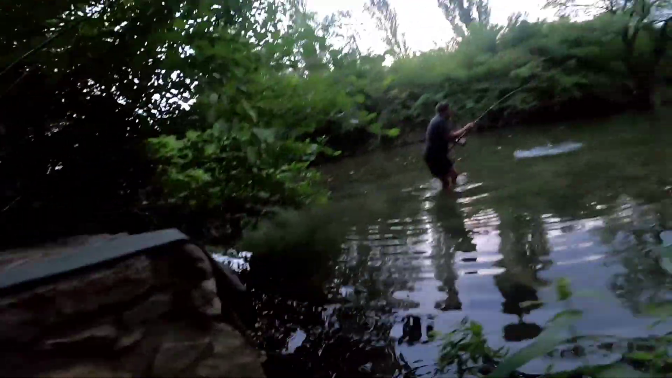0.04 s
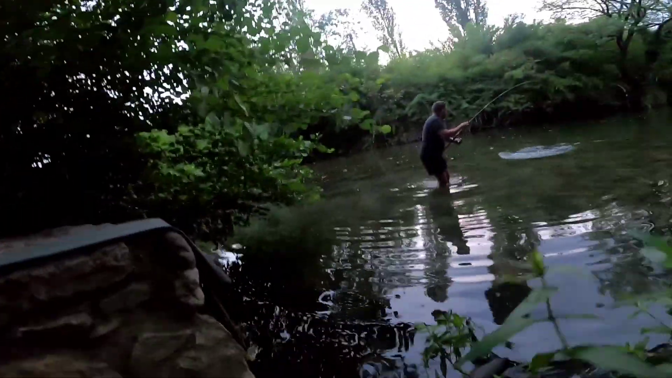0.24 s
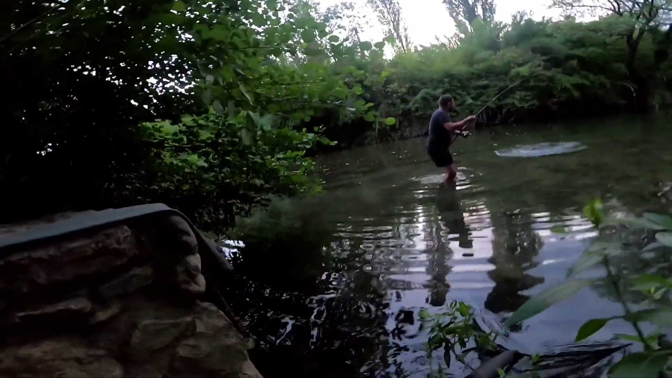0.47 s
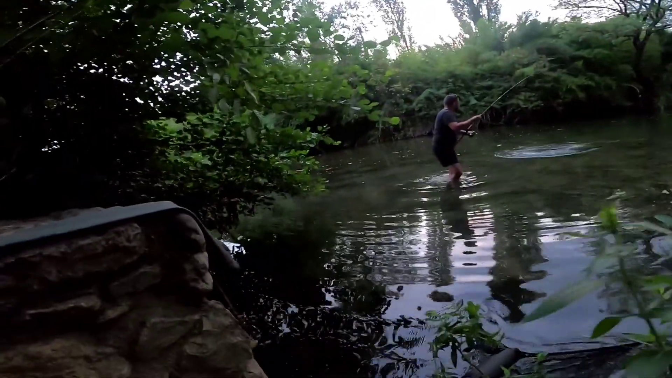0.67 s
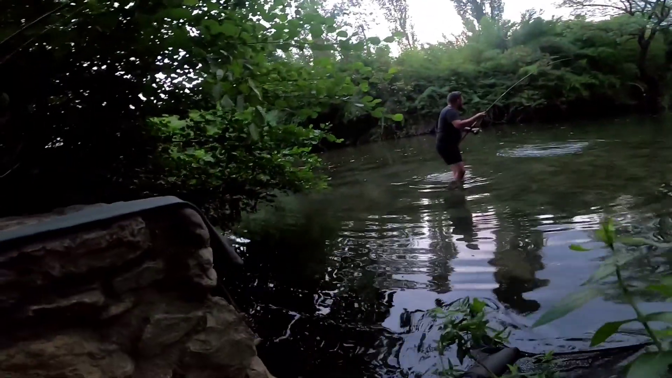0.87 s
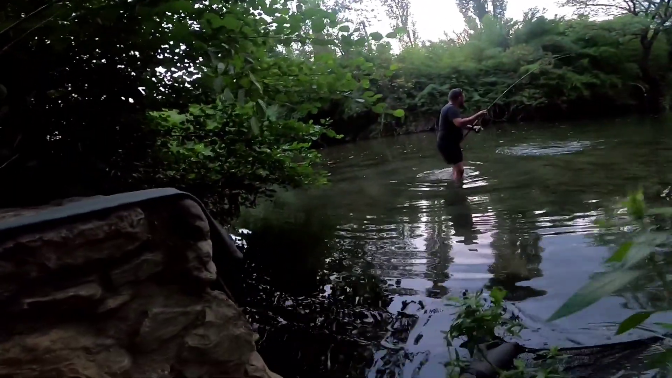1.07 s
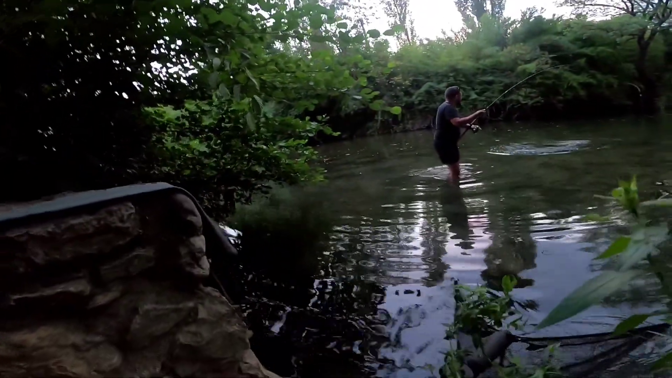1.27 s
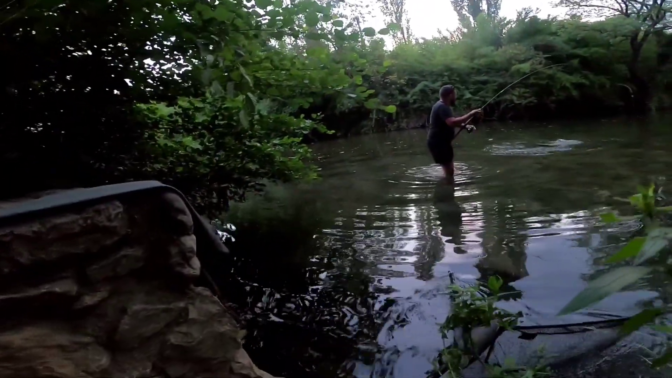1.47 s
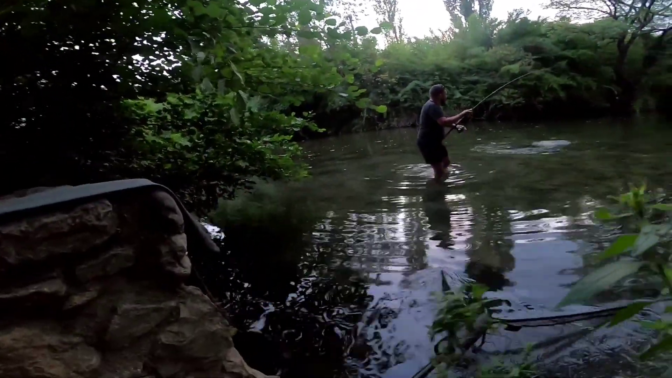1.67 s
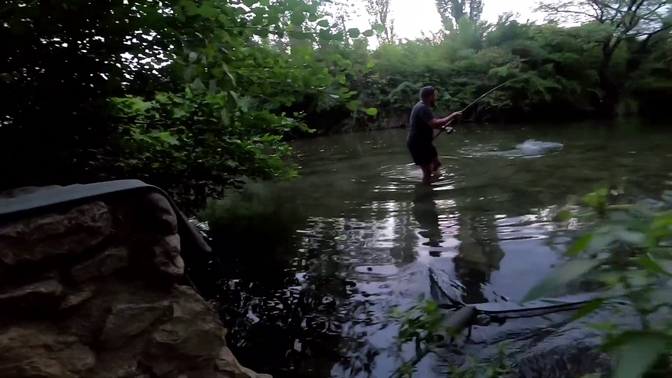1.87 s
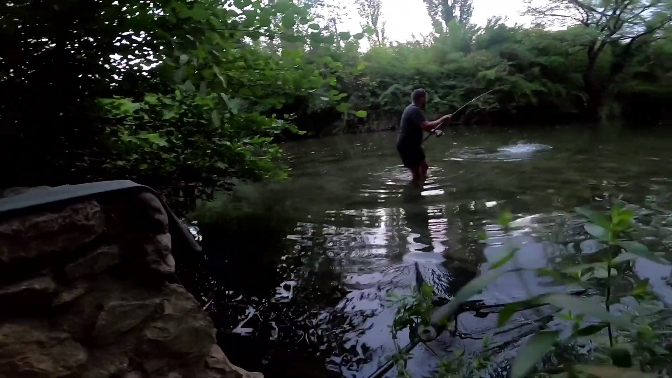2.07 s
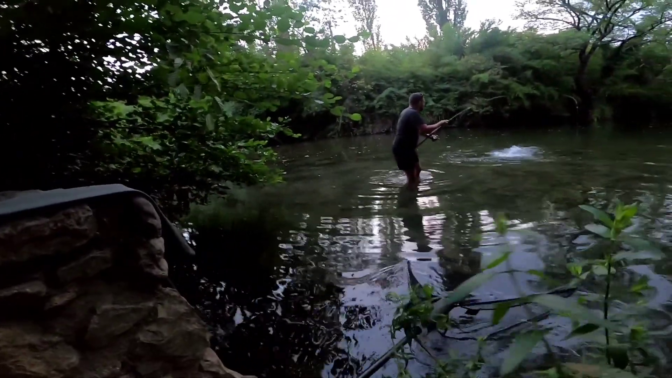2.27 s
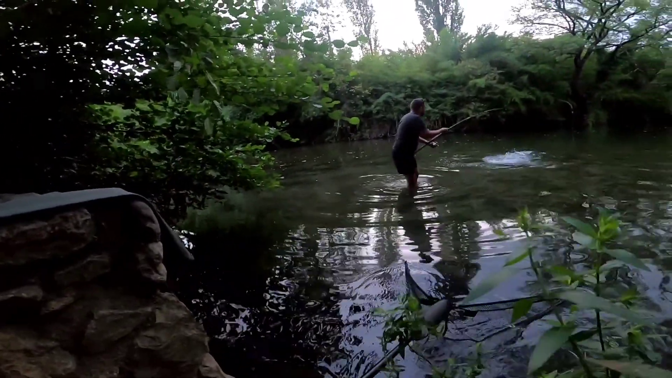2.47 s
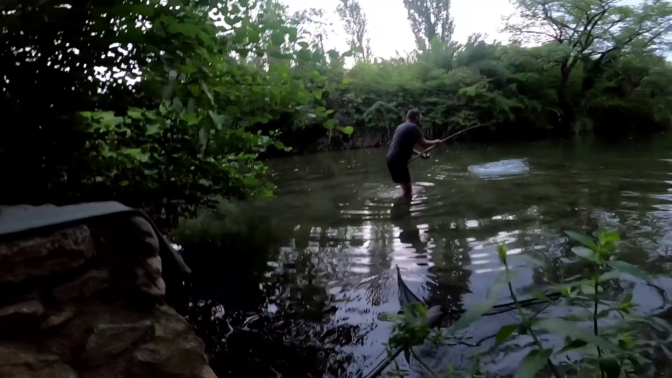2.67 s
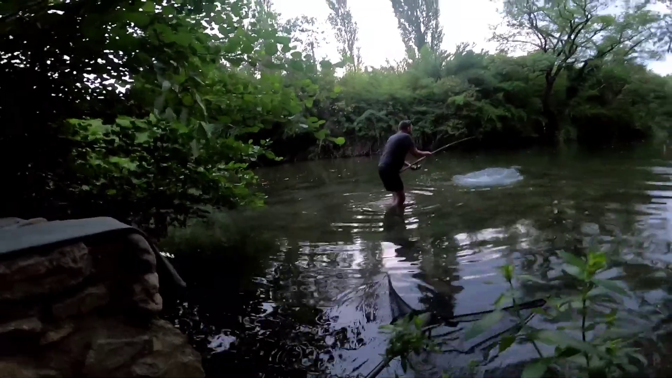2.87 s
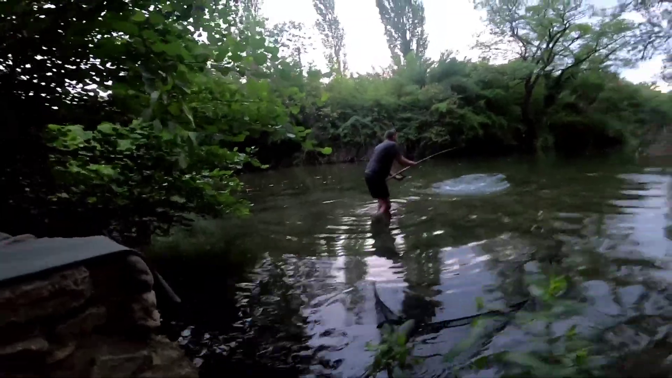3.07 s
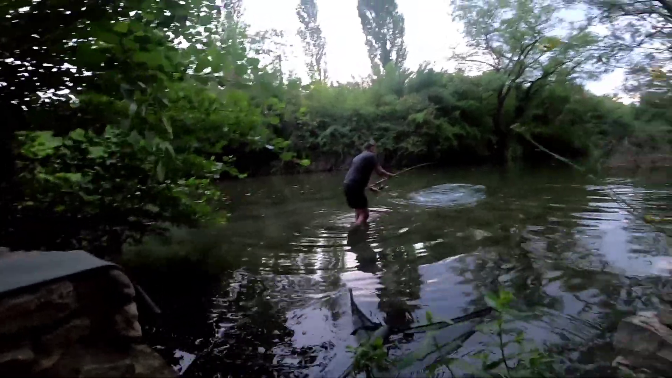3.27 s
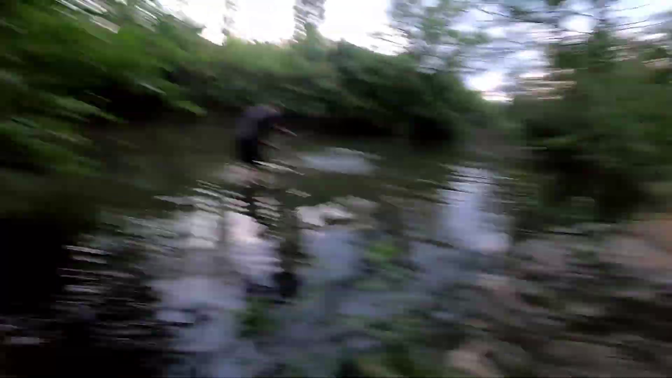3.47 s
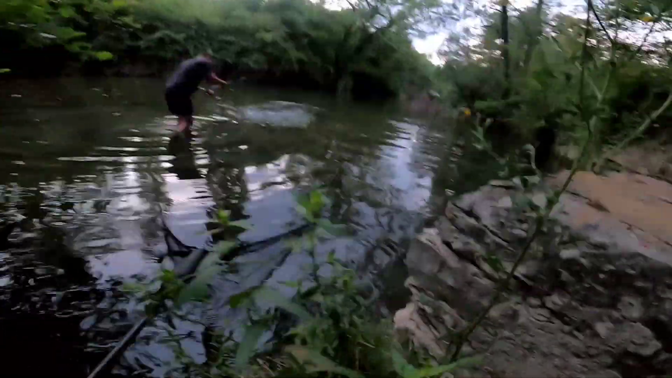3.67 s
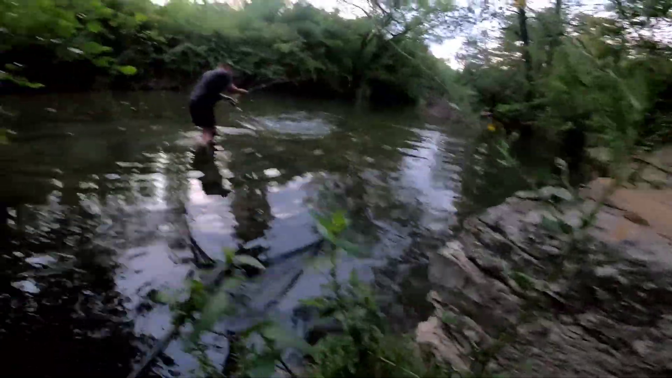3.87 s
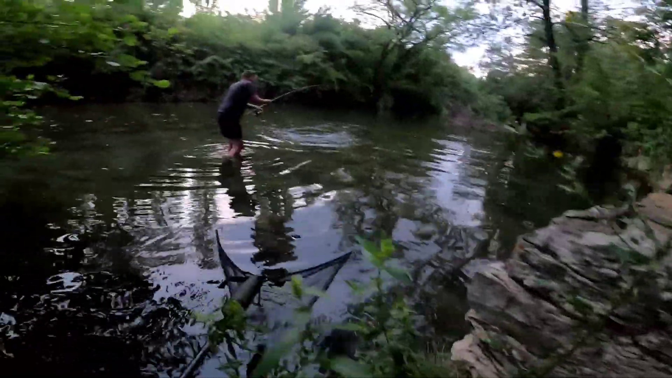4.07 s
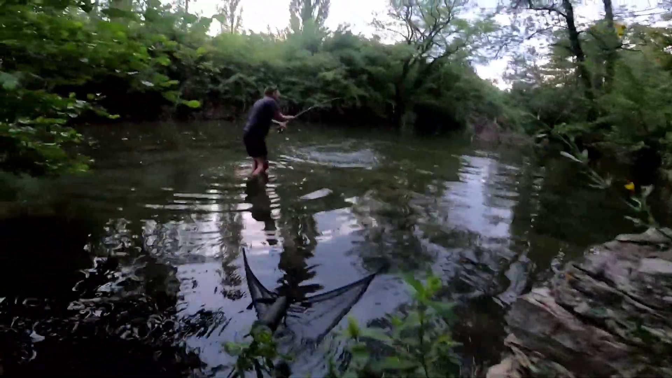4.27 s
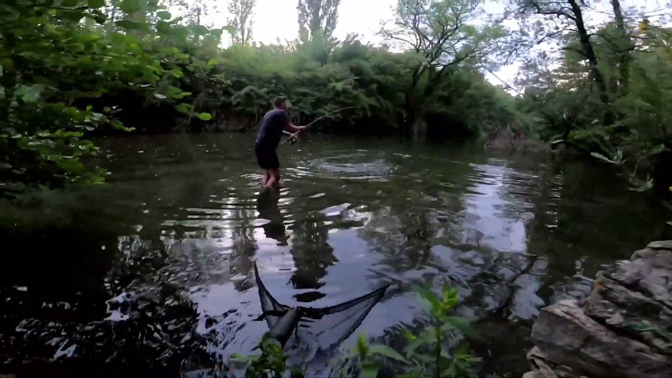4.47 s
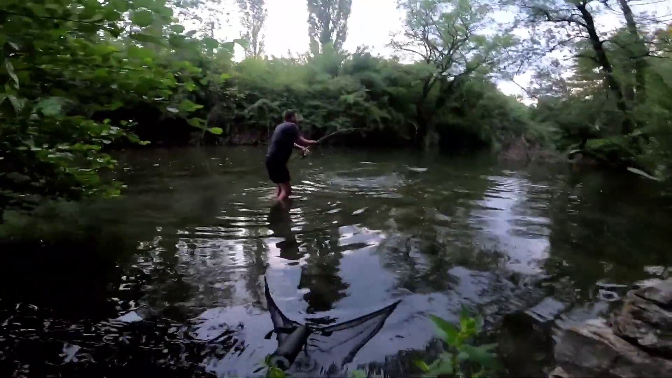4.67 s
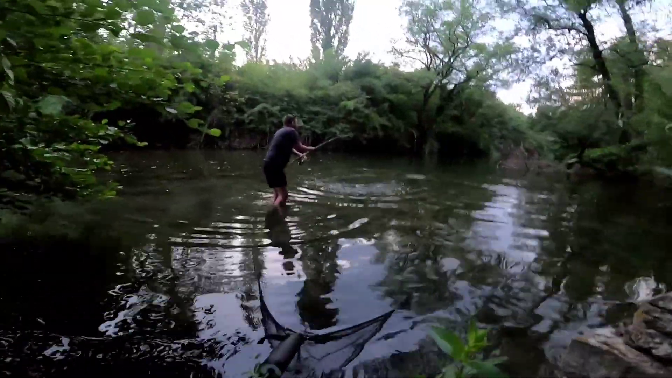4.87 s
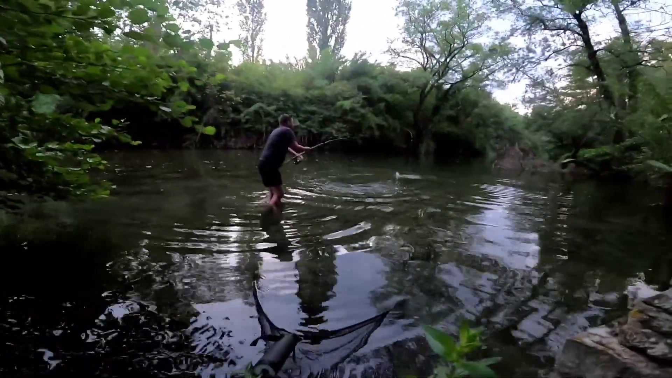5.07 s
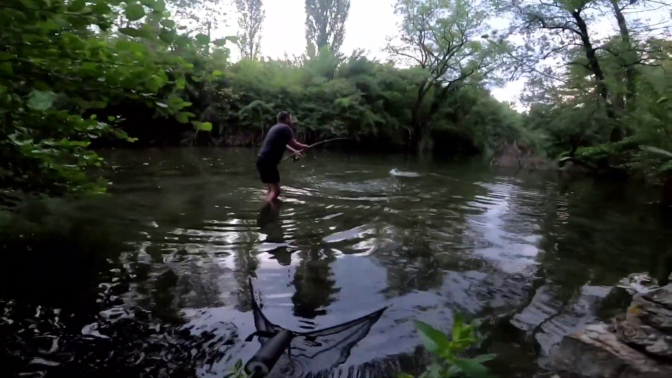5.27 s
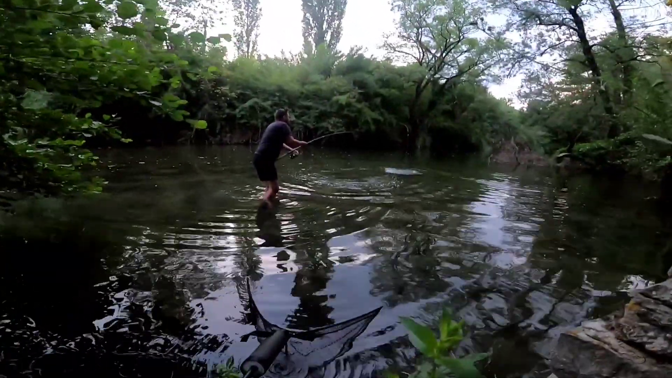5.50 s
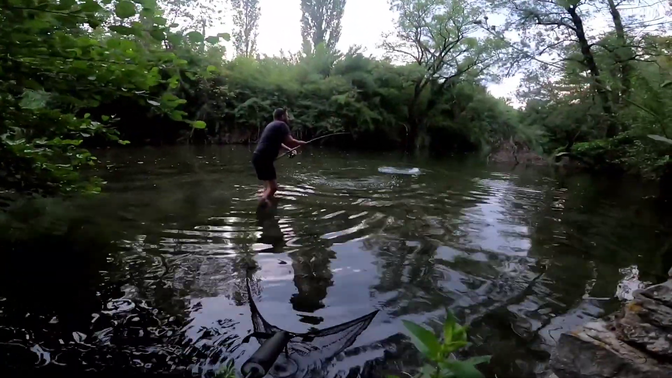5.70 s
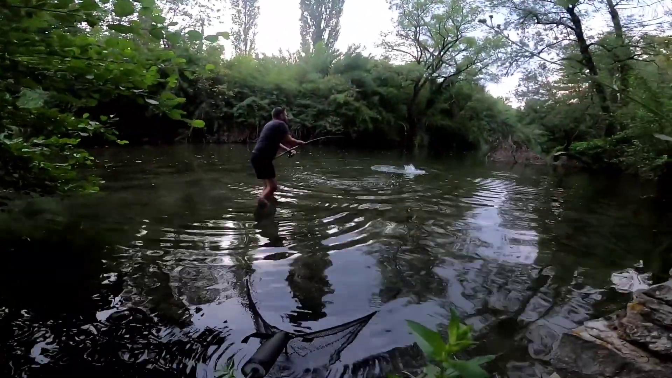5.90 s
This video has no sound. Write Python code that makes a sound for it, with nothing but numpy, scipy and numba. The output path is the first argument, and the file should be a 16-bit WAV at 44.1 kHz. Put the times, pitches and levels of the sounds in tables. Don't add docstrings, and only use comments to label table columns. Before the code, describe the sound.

Outdoors by a tree-lined river, a cicada chirps rapidly over a far insect chorus. Wading legs make small plinks and drips, wind thumps the microphone, then a fish thrashes hard around two seconds with fizzing, gulping splashes. The cicada turns to a continuous drone while drops fall back, then a second splash burst comes with quick reel ticks and renewed chirps.

```python
import sys
import numpy as np
from scipy import signal
from scipy.io import wavfile
from scipy.ndimage import uniform_filter1d
from numba import njit

SR = 44100
rng = np.random.default_rng(int(sys.argv[2]) if len(sys.argv) > 2 else 0)


def voltage_ratio(decibels):
    exponent = np.asarray(decibels, float) / 20
    return 10 ** exponent


def put_to_file(sound):
    columns = np.atleast_2d(sound).T
    safe = np.clip(columns, -1, 1)
    whole_steps = np.round(safe * 32767)
    wavfile.write(sys.argv[1], SR, whole_steps.astype(np.int16))


N = 261954
T = np.arange(N) / SR


def level(x, db):
    return x * voltage_ratio(db) / np.sqrt(np.mean(x ** 2))


def band(x, lo_hz, hi_hz, order=2):
    return signal.sosfilt(signal.butter(order, [lo_hz, hi_hz], "band", fs=SR, output="sos"), x)


def walk(rate):
    hold = int(SR / rate)
    steps = np.repeat(rng.standard_normal(N // hold + 1), hold)
    return 1.64 * uniform_filter1d(uniform_filter1d(steps, hold), hold)[:N]


def even(x, span_s):
    span = int(span_s * SR)
    power = np.mean(np.atleast_2d(x) ** 2, axis=0)
    power = uniform_filter1d(uniform_filter1d(power, span), span)
    return x / np.sqrt(power + 0.077 * np.mean(power))


def swells(s, db, rise_s, fall_s):
    t = T[::64, None]
    rising = (s - t) / np.maximum(rise_s, .005)
    falling = (t - s) / np.maximum(fall_s, .005)
    away = np.maximum(rising, falling)
    return np.interp(T, t[:, 0], np.sqrt(np.sum(voltage_ratio(2 * (db - 20 * away)), axis=1)))


@njit
def ring(s, hz, t60, climb, onset, left, right):
    out = np.zeros((2, N))
    for k in range(len(s)):
        start, n, phase = int(s[k] * SR), int(t60[k] * SR) + 1, 0.
        fade, size = np.exp(-np.log(1000.) / n), 1.
        for i in range(max(-start, 0), min(n, N - start)):
            phase += 2 * np.pi * hz[k] * (1 + climb[k] * min(3 * i / n, 1.25) ** 1.6) / SR
            size *= fade
            v = size * np.sin(phase) * np.sin(min(phase / onset, np.pi / 2)) ** 2
            out[0, start + i] += left[k] * v
            out[1, start + i] += right[k] * v
    return out


def grains(s, db, hz, t60, climb, pan_db, onset=1.6):
    s, db, hz, t60, climb, pan_db = (np.zeros(len(s)) + c for c in (s, db, hz, t60, climb, pan_db))
    left, right = voltage_ratio(db + pan_db / 2), voltage_ratio(db - pan_db / 2)
    return ring(s, hz, np.clip(t60, 1e-3, 1), np.clip(climb, -.2, 1.5), onset, left, right)


def foam(lo_hz, hi_hz, cycles, climb, scatter_db, count):
    when, size, tune, place = rng.random((count, 4)).T
    hz = lo_hz * (hi_hz / lo_hz) ** tune
    db = -scatter_db * np.log(size + 0.01)
    pan_db = 3 * (place - .5) - 1.8
    return even(grains(when * N / SR, db, hz, cycles / hz, climb, pan_db, onset=5.3), 0.032)


def splash():
    # t/s, strength/dB, depth [0-1], rise/s, fall/s (each over 20 dB)
    slaps = [(0.01, -49, 0.3, 0.12, 0.21), (0.42, -54, .0, 0.86, 0.23), (1.5, -60.5, 0.27, 0.25, 0.55),
             (1.7, -66, 0.99, 0.089, 0.08), (1.8, -54.5, 0.4, 0.24, 0.062), (2.026, -37.5, 0.94, 0.22, 0.2),
             (2.1, -40, 0.52, 0.36, 0.26), (2.19, -37.5, 0.79, 0.23, 0.43), (2.33, -45.5, 0.48, 0.23, 0.26),
             (2.49, -39, 0.44, 0.21, 0.4), (2.62, -55, 0, 0.27, 0.18), (2.722, -52.5, 0.84, 0.1, 0.23),
             (2.95, -51.5, 0.1, 0.48, 0.57), (4.75, -67, 1, 0.073, 0.25), (4.84, -51.5, 0.37, 0.15, 0.11),
             (5.17, -41.5, 0.29, 0.07, .3), (5.276, -39.5, 0.5, 0.091, 0.31),
             (5.44, -50, 0.24, 0.073, 0.89), (5.7, -45.5, 0.8, 0.026, 0.34),
             (5.81, -46.5, 0.44, 0.21, 0.26), (5.93, -38.5, 0.82, 0.14, .3)]
    s, db, depth, rise, fall = np.transpose(slaps)
    cavities = foam(143.8, 270, 24.0, 0.068, 2.7, count=800)
    bubbles = foam(301.0, 883, 17.0, 0.29, 2.35, count=3500)
    fizz = foam(863, 1800, 17.3, 0.3, 3.1, count=9000)
    fizz = fizz + voltage_ratio(-5.0) * foam(1890, 4030, 21, 0.26, 2.6, count=12000)
    bubble_db = db + 3.5 - 46 * np.maximum(0.47 - depth, 0)
    cavity_db = db + 14.5 - 66 * (1 - np.minimum(depth, 1))
    span = 0.56
    out = swells(s, db, rise, fall) * fizz
    out = out + swells(s, bubble_db, span * rise, span * fall) * bubbles
    out = out + swells(s, cavity_db, span * rise, span * fall) * cavities
    return out * voltage_ratio(1.58 * walk(28) - 3)


def bursts():
    # t/s, peak level/dB, f/Hz
    large = [(1.88, -38, 1610), (1.913, -33, 1050), (1.966, -31, 1260), (1.998, -28, 1450),
             (2.045, -25, 1230), (2.062, -25, 1400), (2.108, -32, 930), (2.141, -22.5, 980),
             (2.174, -30, 684), (2.183, -23.5, 632), (2.214, -35, 576), (2.261, -28.5, 613),
             (2.281, -26, 1030), (2.394, -28, 859), (2.409, -42, 820), (2.434, -28.5, 1030),
             (2.463, -33, 1500), (2.472, -26, 740), (2.484, -27, 672), (2.524, -27, 960),
             (2.537, -31, 1053), (2.579, -35, 646), (2.624, -35.5, 800), (2.649, -36, 1040),
             (2.689, -47, 1050), (2.755, -28.5, 974), (2.778, -38, 1040), (2.823, -33.5, 1000),
             (2.85, -35, 1010), (5.196, -31, 1000), (5.275, -32, 1340), (5.32, -27, 980), (5.39, -39, 1130),
             (5.425, -40, 1850), (5.452, -39, 1150), (5.484, -33, 1430), (5.623, -44, 1510),
             (5.692, -23.5, 1710), (5.741, -28, 1194), (5.859, -39, 555), (5.909, -24.5, 985)]
    # t/s, peak level/dB, f/Hz
    last = [
        (2.875, -48, 2150),
        (2.976, -43, 1500),
        (3.017, -38, 1630),
        (3.043, -42, 1440),
        (3.131, -38, 1530),
        (3.332, -47, 1220),
    ]
    # t/s, peak level/dB, f/Hz
    spray = [(1.994, -36, 3040), (2.0323, -38, 2120), (2.1081, -38, 2270), (2.157, -42, 2250),
             (2.182, -31, 2120), (2.2762, -40, 2090), (2.34, -28, 2460), (2.387, -42, 2200),
             (2.4224, -39, 2150), (2.4618, -43, 3080), (2.4912, -29.5, 2185), (2.6257, -33, 2230),
             (3.0614, -36, 2720), (5.288, -29.5, 2120), (5.4266, -46, 1920), (5.446, -34, 2100),
             (5.6466, -44, 1970), (5.7444, -45, 3580), (5.852, -38, 2810)]
    s, db, hz = np.transpose(large + last)
    out = grains(s, db - 2.0, hz, 31.7 / hz, 0.24, -2.4, onset=5.3)
    s, db, hz = np.transpose(spray)
    return out + grains(s, db + 0.5, hz, 28 / hz, 0.091, -.6, onset=2.6)


def gulps():
    # t/s, peak level/dB, f/Hz, t60/s
    big_air = [(1.601, -53.5, 505, 0.086), (1.802, -42, 490, 0.066), (1.851, -28, 255, 0.052),
               (1.909, -30.5, 185, 0.28), (1.984, -31, 204, .1), (1.997, -25, 163, 0.14),
               (2.071, -26.5, 156, 0.12), (2.129, -43, 144, 0.49), (2.169, -32, 466.4, 0.23),
               (2.251, -33.5, 150, 0.26), (2.003, -28, 107, 0.16), (2.46, -34, 158, 0.23),
               (2.464, -36, 152, 0.18), (2.482, -33, 537, .09), (2.33, -43, 167, 0.41),
               (2.722, -35, 544, 0.087), (3.049, -54.5, 428, 0.16), (4.83, -41, 298, 0.17),
               (5.254, -33.5, 217, 0.22), (5.275, -28, 343, 0.08), (5.284, -26, 372, 0.082),
               (5.52, -52, 497, 0.2), (5.727, -22, 158, 0.039), (5.734, -28.5, 148, 0.14),
               (5.735, -25.5, 555, 0.036), (5.9, -34, 93, .25), (5.9, -35, 444, 0.19),
               (5.925, -25.5, 416, 0.12)]
    s, db, hz, t60 = np.transpose(big_air)
    return grains(s, db, hz, t60, 0.036 + 0.15 * hz / 1000, -0.26, onset=6.3)


def drips():
    # t/s, peak level/dB, f/Hz, pitch climb [share], t60/s
    wading = [(0.074, -40, 1294, 0.38, 0.059), (0.17, -47, 953, 0.23, 0.066),
              (0.25, -44, 1080, 0.52, 0.058), (0.304, -38, 1050, 0.81, 0.055),
              (0.326, -35.5, 1104, 0.69, 0.081), (0.352, -37.5, 940, 0.65, 0.075),
              (0.384, -42.5, 2130, 0.2, 0.037), (.419, -34, 1590, -0.2, 0.013),
              (0.443, -37, 864, 0.47, 0.14), (0.469, -38, 3000, 0.033, 0.025),
              (.479, -40, 3550, -0.018, .015), (.49, -47, 970, .05, 0.061),
              (0.556, -34.5, 2800, -0.11, 0.03), (0.574, -41, 2560, 0.33, 0.029),
              (.668, -44.5, 1440, 0.24, 0.043), (.685, -48, 1050, 0.13, 0.057),
              (0.994, -33.5, 3650, .4, 0.026), (1.014, -39, 2254, .02, 0.064),
              (1.014, -34, 3660, -0.27, 0.023), (1.053, -41.5, 2700, 0.22, .02),
              (1.15, -53, 1063, 0.15, 0.13), (1.25, -39, 1250, 1, 0.061),
              (1.311, -33.5, 1220, -0.36, 0.013), (1.312, -39.5, 836, -.05, 0.066),
              (1.379, -42, 2210, 0.13, .03), (1.425, -41, 2280, -0.12, .025),
              (1.446, -38, 2510, 0.57, 0.019), (1.446, -36, 1500, 0.29, 0.0074),
              (1.45, -43.5, 990, 0.15, .04), (1.515, -29, 1066, 0.31, 0.06),
              (1.532, -45.5, 808, 0.61, 0.16), (1.558, -42, 1460, -0.098, .02),
              (1.59, -39, 1470, -0.022, 0.039), (1.63, -46.5, 940, 0.41, 0.066),
              (1.741, -44, 1190, 0.57, 0.062), (1.79, -39, 955, 0.091, 0.052),
              (1.815, -40, 817, 0.64, 0.08)]
    # t/s, peak level/dB, f/Hz, pitch climb [share]
    thrown = [(2.034, -28, 1040, 0.27), (2.337, -36, 910, 0.045), (2.792, -30.5, 1890, 0.064),
              (2.875, -40, 2140, 0.045), (3.351, -33.5, 1238, 0), (4.073, -43, 2840, 0.27),
              (4.226, -33.5, 1662, 1.13), (4.233, -38, 2260, 1.9), (4.238, -36, 1660, 0.57),
              (4.607, -41, 2500, 0.3), (4.735, -45, 1450, .1), (4.778, -47.5, 1490, 0.029),
              (4.851, -54, 1020, 0), (4.995, -42, 1256, 0.29), (5.021, -43, 1460, 0.28),
              (5.149, -35.5, 1290, 0.51), (5.16, -33, 1020, 0.053), (5.265, -34, 1356, 0.14),
              (5.688, -33.5, 1806, 0.061), (5.841, -35.5, 1330, 0.69), (5.911, -29.5, 1366, 0.46),
              (5.693, -35, 1240, 0.054)]
    falling = [(s, db, hz, climb, .066 * (hz / 1000) ** -0.45) for s, db, hz, climb in thrown]
    s, db, hz, climb, t60 = np.transpose(wading + falling)
    return band(grains(s, db, hz, t60, climb, -1.6, onset=1.7), 1020, 7800)


def pockets():
    # t/s, length/s, peak level/dB, from f/Hz, to f/Hz
    slides = [
        (0.417, 0.021, -32, 820, 1730),
        (5.156, .03, -39.5, 750, 366),
        (5.178, 0.037, -43.5, 363, 313),
        (5.226, 0.028, -37, 706, 261),
        (5.292, 0.048, -38.5, 422, 914),
        (5.758, 0.068, -40, 189.4, 530),
        (5.848, 0.039, -39.5, 675, 375),
    ]
    out = 0
    for s, length, db, from_hz, to_hz in slides:
        u = np.clip((T - s) / length, 0, 1)
        phase = 2 * np.pi * np.cumsum(from_hz * (to_hz / from_hz) ** u) / SR
        out = out + voltage_ratio(db) * np.sin(np.pi * u ** 0.66) * np.sin(phase)
    return out * voltage_ratio(0) * voltage_ratio(np.array([[-.7], [.7]]))


def reel():
    # t/s, peak level/dB
    ticks = [(4.2862, -48), (4.298, -45), (4.3141, -45), (4.338, -47), (5.1396, -42), (5.148, -41),
             (5.1597, -35), (5.1775, -41), (5.198, -43), (5.2121, -43), (5.221, -39), (5.2305, -40),
             (5.241, -38), (5.2534, -40), (5.2624, -37), (5.273, -36), (5.2819, -37), (5.2914, -39),
             (5.301, -43), (5.309, -41), (5.3193, -36), (5.33, -42), (5.811, -45), (5.8252, -46),
             (5.84, -44), (5.852, -41), (5.8635, -39), (5.874, -38), (5.885, -36), (5.893, -37),
             (5.898, -37), (5.9067, -35), (5.9147, -31.5)]
    s, db = np.transpose(ticks)
    out = grains(s, db + 5.5, 2825, 0.011, 0, .8)
    for hz, snap_db in [(5100, -16), (8800, -9), (12500, -20), (14800, -14)]:
        out = out + grains(s, db + snap_db, hz, 0.0043, 0, .8)
    return out


def buckles(rate, jitter, spread_s, count):
    pulls = np.cumsum(1 + jitter * rng.standard_normal(3000)) / rate
    s = (pulls[:, None] + spread_s * rng.random((3000, count))).ravel()
    return s[s < N / SR]


def cicada(modes, rate, t60, scatter_db, pitch, pan_db):
    s = buckles(rate, .03, .004, count=len(modes))
    chance = rng.standard_normal((30000, 2))[:len(s)].T
    hz, spread, db = np.transpose(modes)[:, np.arange(len(s)) % len(modes)]
    hz = (hz + spread * chance[0]) * np.interp(s, T, pitch)
    return level(grains(s, db + scatter_db * chance[1], hz, t60, 0, pan_db, onset=6.4), 0)


def chirping(chirps, modes, rate, rise_s, fall_s, climb, swell_db, t60, trim_db):
    gate, pitch = np.zeros(N), 1 + 0.0024 * walk(7.1)
    for s, db, length in chirps:
        u = T - s
        on = np.clip(np.minimum(u / rise_s + .5, (length - u) / fall_s + .5), 0, 1)
        gate += voltage_ratio(db + trim_db + swell_db * np.clip(u / length - .5, -1, 1)) * on
        pitch += (on > 0) * climb * (u / length - .5)
    return gate * cicada(modes, rate, t60, 2.5, pitch, -8.0)


def first_chirps():
    # t/s, length/s
    calls = [(0.024, 0.056), (0.113, 0.066), (0.225, 0.082), (0.334, 0.077), (0.434, 0.083), (0.549, 0.087),
             (0.653, 0.094), (0.774, 0.083), (0.878, 0.08), (1.008, 0.062), (1.1, 0.082), (1.21, 0.081),
             (1.329, 0.079), (1.443, 0.081), (1.546, 0.075), (1.662, 0.087), (1.767, 0.09), (1.889, 0.076),
             (1.996, 0.093), (2.116, 0.08), (2.214, 0.071), (2.318, 0.072)]
    # f/Hz, spread/Hz, level/dB
    modes = [(5360, 62, -4.5), (5946, 13, -1.5), (6110, 96, -4), (6365, 24, -2.5), (6630, 40, -4.5),
             (6920, 57, -6.5), (7630, 73, -17.5), (8540, 490, -20), (10250, 600, -19), (11800, 600, -42)]
    lead_s, lag_s = 0.0091, -0.0018
    chirps = []
    for k, (s, length) in enumerate(calls):
        db = -38 - 0.1 * (-1) ** k - 5.5 * (s / 2.5) ** 2
        chirps.append((s - lead_s, db, length + lead_s + lag_s))
    return chirping(chirps, modes, 170, 0.008, 0.005, 0.0064, 3.5, 0.016, -7)


def late_chirps():
    # t/s, peak level/dB, length/s
    calls = [
        (5.103, -39, 0.047),
        (5.226, -37, 0.04),
        (5.33, -35, 0.035),
        (5.4464, -34.5, 0.035),
        (5.555, -33, 0.034),
        (5.668, -34.5, 0.053),
        (5.782, -33, 0.047),
        (5.8909, -37.5, 0.13),
    ]
    # f/Hz, spread/Hz, level/dB
    modes = [(5500, 51, 0), (6050, 35, -3), (6150, 35, -2.5), (6510, 70, -5.5), (7010, 60, -4.5),
             (8030, 300, -15.5), (8900, 460, -20.5), (10200, 520, -25)]
    return chirping(calls, modes, 200, 0.02, 0.11, 0.04, 0, .03, -3.5)


def drone():
    # t/s, effort level/dB, middle f/Hz
    course = [(0.0, -59, 6150), (1.9, -59, 6260), (2.5, -53, 6250), (2.8, -51, 6290), (2.93, -45, 6240),
              (3.15, -46.5, 6190), (3.25, -53, 6260), (3.45, -52, 6230), (3.53, -45.5, 6180),
              (3.63, -54, 6200), (3.85, -52, 6060), (4.05, -52, 6180), (4.17, -44.5, 6310),
              (4.4, -45.5, 6310), (4.6, -50, 6370), (5.05, -50, 6310), (5.35, -56, 6170), (5.94, -50, 6150)]
    # f/Hz, spread/Hz, level/dB
    modes = [(6230, 20, -1), (6285, 20, 0), (6640, 110, -10), (6020, 110, -11), (6800, 120, -13)]
    s, db, hz = np.transpose(course)
    pitch = np.interp(T, s, hz) / 6260
    return voltage_ratio(np.interp(T, s, db) - 5) * cicada(modes, 137, .035, 0.57, pitch, -.6)


def grasshopper():
    # t/s, level/dB
    effort = [
        (0, -70),
        (3.3, -73.5),
        (3.8, -67.5),
        (4.4, -65.5),
        (4.7, -68),
        (5.94, -66),
    ]
    s = buckles(45, 0.033, 0.015, count=6)
    chance = rng.standard_normal((18000, 2))[:len(s)].T
    scrapes = level(grains(s, 3.9 * chance[0], 10550 + 600 * chance[1], 0.0058, 0, 11.0), 0)
    return voltage_ratio(np.interp(T, *np.transpose(effort))) * scrapes


def chorus(hz, spread_hz, t60, lean, throb_db, count):
    throb_hz, throb_turn = 4.47, .18
    out = 0
    for k, (tune, pace, place, late) in enumerate(rng.random((count, 4))):
        tune = (k + tune) / count
        s = buckles(130 + 170 * pace, .12, .003, count=2)
        chance = rng.standard_normal((6000, 2))[:len(s)].T
        throb = np.cos(2 * np.pi * (throb_hz * s + throb_turn + 0.14 * late))
        db = 3.3 * chance[0] + throb_db * (1 - tune) * throb
        stray = 1.86 * (tune - .5) + chance[1]
        singer_hz = hz + spread_hz * (stray + lean * stray ** 2)
        out = out + grains(s, db, singer_hz, t60, 0, 8 * (place - .5), onset=6.7)
    return level(out, 0)


def far_insects():
    # t/s, level/dB
    high = [
        (0.0, -49),
        (4.9, -47),
        (5.94, -46),
    ]
    # t/s, level/dB
    low = [
        (0, -57),
        (.9, -58.5),
        (5.94, -61.5),
    ]
    # t/s, level/dB
    answers = [
        (0, -55.5),
        (2.0, -59),
        (2.5, -52),
        (4.9, -51.5),
        (5.4, -51.5),
    ]
    out = voltage_ratio(np.interp(T, *np.transpose(high)) - 1.0 + 0.89 * walk(9.9)) * chorus(4464, 269, 0.015, 0.16, 3.66, count=10)
    low_song = band(chorus(2340, 198, 0.0094, .1, 0, count=6), 1840, 3360)
    out += voltage_ratio(np.interp(T, *np.transpose(low)) + 2.1 * walk(3.16)) * low_song
    out += voltage_ratio(np.interp(T, *np.transpose(answers)) + 1.2 * walk(3.3)) * chorus(6205, 352, 0.011, -.12, 0, count=6)
    return out


def leaves(x, t60, wet_db):
    t = np.arange(SR // 2) / SR
    mid, side = rng.standard_normal((2, len(t))) * np.exp(-np.log(1000) * t / t60) * (t > .002)
    side = band(side, 720, 22000, order=1)
    tail = np.array([mid / 2 + side, mid / 2 - side]) / np.sqrt(2 * np.sum(mid ** 2))
    return x + voltage_ratio(wet_db) * signal.fftconvolve(x.mean(axis=0, keepdims=True), tail, axes=1)[:, :N]


def knocks():
    # t/s, peak level/dB, f/Hz, t60/s, left minus right/dB
    bumps = [(0.863, -46.5, 200, 0.034, -2), (1.199, -31.5, 59.6, 0.084, 13), (1.268, -20.5, 66, 0.049, 14),
             (1.468, -35.5, 89.5, 0.043, 9), (1.7, -44, 150, .06, 8), (2.714, -28.5, 593, 0.0093, -14),
             (3.559, -43, 185, 0.067, -2.5), (3.69, -31.5, 1460, 0.0076, 20), (3.692, -45, 290, 0.034, 1),
             (3.733, -30.5, 2740, 0.0036, 6), (4.824, -36, 110, 0.019, -2.5), (4.822, -40, 910, 0.0037, 0),
             (4.78, -51, 603, 0.075, -7), (4.783, -44.5, 206, 0.045, 6), (3.692, -40, 905, 0.019, 3)]
    s, db, hz, t60, pan_db = np.transpose(bumps)
    return grains(s, db, hz, t60, 0, pan_db, onset=1.3)


def wind():
    # t/s, level/dB, rise/s, fall/s (each over 20 dB), left minus right/dB
    puffs = [(0.0, -46, 0.1, 0.13, 3), (0.349, -70, 0.64, .5, 2), (0.72, -59, .3, .15, 1),
             (1.21, -32.5, 0.039, 0.45, 1.5), (1.3, -39, 0.11, 0.25, 11), (1.49, -35.5, 0.18, 0.06, 19.5),
             (1.72, -33, 0.088, 0.11, 10), (1.78, -37, 0.14, 0.065, 4), (2.02, -66, .3, .5, -2),
             (2.72, -54, 0.027, 0.17, 8), (3.16, -61, 0.11, 0.21, 7), (3.45, -53, 0.14, .1, 2),
             (3.5, -48, 0.091, 0.082, 2), (3.57, -39, 0.062, 0.12, 3), (3.721, -46.5, .08, 0.076, 6),
             (3.65, -43.5, .06, 0.08, 4), (3.89, -57, 0.085, .1, -1), (4.07, -53, 0.13, 0.16, 4),
             (4.32, -55.5, .08, 0.11, 1), (4.75, -52.5, 0.09, .1, 1), (4.84, -43, 0.097, 0.11, 4),
             (4.92, -49, 0.086, 0.06, 5), (5.03, -49, 0.065, 0.075, 7), (5.4, -58, .1, .1, 5),
             (5.48, -52, 0.055, 0.074, 6), (5.94, -54, 0.065, .1, -2)]
    s, db, rise, fall, pan_db = np.transpose(puffs)
    gust = []
    for side in (1, -1):
        share_db = 10 * np.log10(2 / (1 + voltage_ratio(-2 * side * pan_db)))
        gust.append(swells(s, db + share_db, rise, fall) + voltage_ratio(-75))
    eddies = [even(band(port, 11.9, 39.0, order=3), 0.068) for port in rng.standard_normal((2, N))]
    bite = voltage_ratio(3.2 * walk(24.63)) * even(band(rng.standard_normal((2, N)), 57.4, 96.0), 0.018)
    edge = np.clip((swells(s, db, rise, fall) / voltage_ratio(-34.0)) ** 2.1, voltage_ratio(-38), 1)
    lumps = voltage_ratio(1.8 * walk(26.12) - 0.5)
    return np.array(gust) * lumps * (np.array(eddies) + voltage_ratio(-6.0) * edge * bite)


def air():
    # f/Hz, level per Hz/dB
    spectrum = [(110, -22.5), (165, -2.5), (350, -13.5), (750, -19.5), (1100, -11), (1800, -14),
                (3300, -11), (7500, -12), (9000, -16.5), (10700, -17), (12500, -32), (14000, -48)]
    hzs, dbs = np.transpose(spectrum)
    out = 0
    for hz in 110 * 2 ** np.arange(0, 7.1, .35):
        mid, side = band(rng.standard_normal((2, N)), hz / 1.142, hz * 1.132)
        db = np.interp(np.log(hz), np.log(hzs), dbs) + 0.7 * walk(9.9) + 1.4 * walk(30)
        width = min(.5 + hz / 6100.0, 1)
        out = out + voltage_ratio(db) * (mid + width * side * np.array([[1], [-1]]))
    return level(out, -56)


def scene():
    water = leaves(splash() + bursts() + gulps(), 0.08, -4.0)
    water = water + leaves(drips() + pockets() + reel(), 0.065, -7)
    near = first_chirps() + late_chirps() + drone() + grasshopper()
    insects = leaves(near, .03, -3) + leaves(far_insects(), 0.33, -3.0)
    return water + insects + knocks() + wind() + air()


def low_pass(x):
    return signal.sosfilt(signal.butter(12, 15620, fs=SR, output="sos"), x)


def record(dry):
    mix = np.array([np.roll(dry[0], 1), dry[1]])
    return low_pass(mix)


dry = scene()
out = record(dry)
put_to_file(out)
```